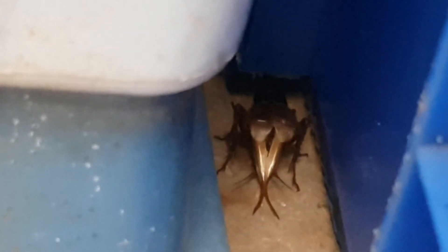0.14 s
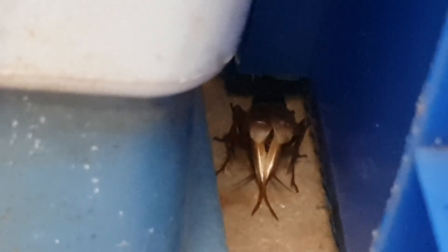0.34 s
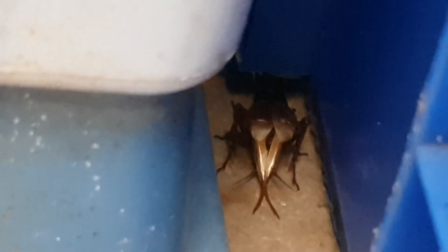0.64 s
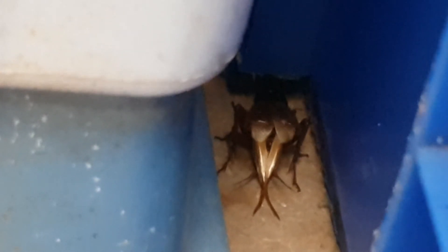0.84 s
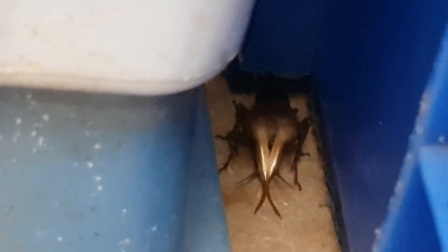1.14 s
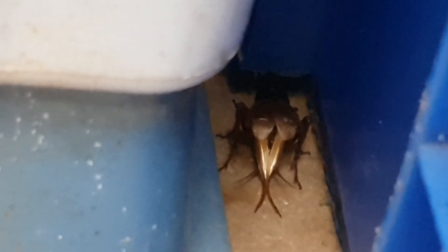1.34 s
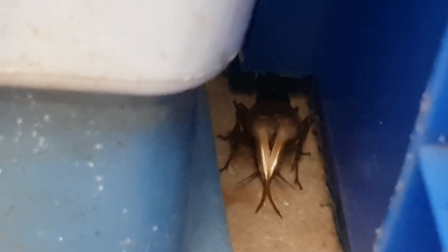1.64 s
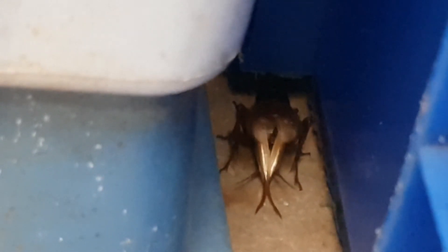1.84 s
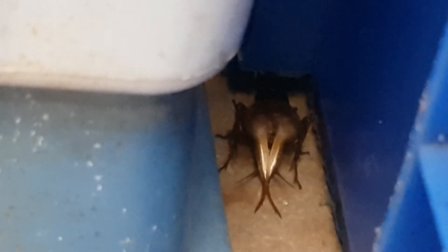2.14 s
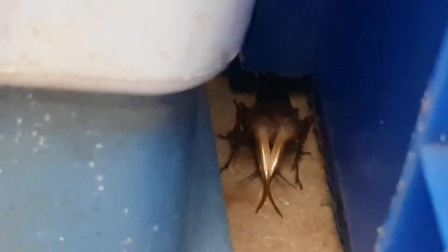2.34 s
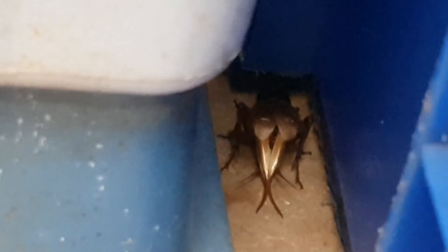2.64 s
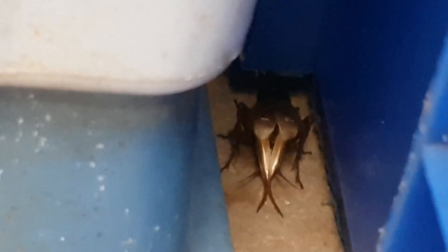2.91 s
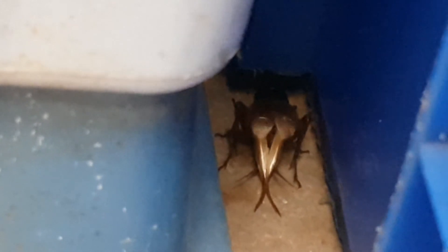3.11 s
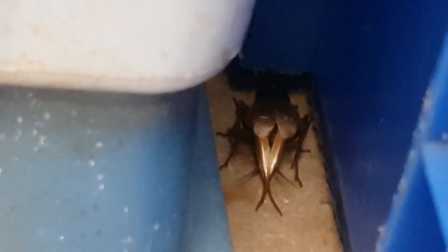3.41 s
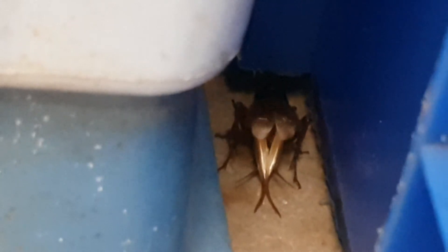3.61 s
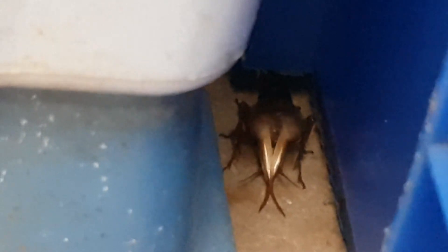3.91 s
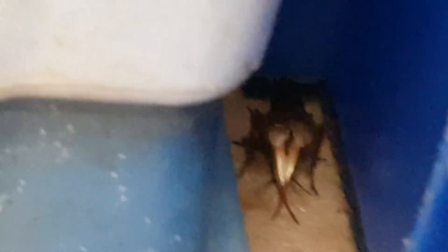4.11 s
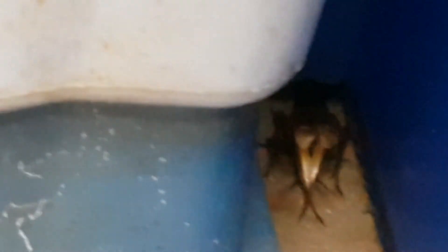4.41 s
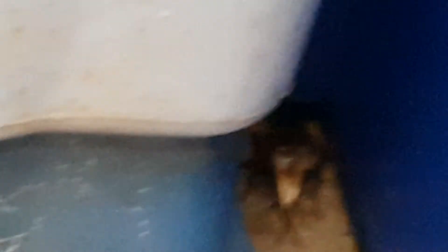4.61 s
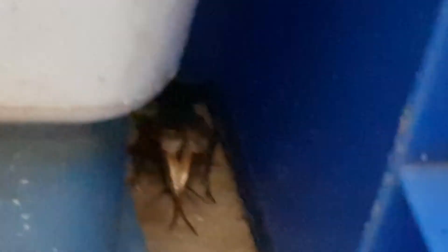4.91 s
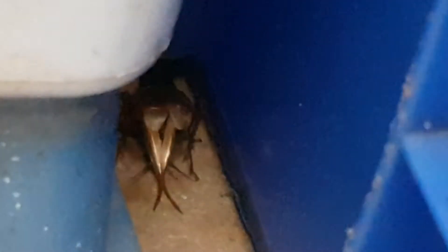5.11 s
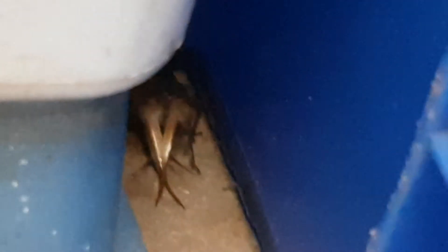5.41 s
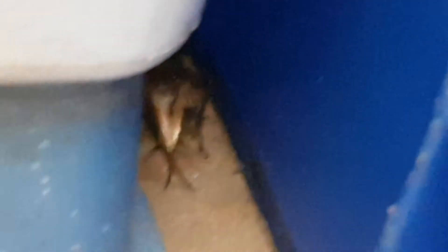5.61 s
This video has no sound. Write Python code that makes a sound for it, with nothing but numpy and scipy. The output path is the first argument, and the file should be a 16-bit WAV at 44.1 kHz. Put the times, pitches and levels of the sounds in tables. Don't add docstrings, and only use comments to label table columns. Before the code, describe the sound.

A cricket chirps loudly at very close range, a steady train of piercing high chirps with tight echoes in a quiet room.

```python
import sys
import numpy as np
from scipy import signal
from scipy.fft import rfft, irfft
from scipy.io import wavfile
from scipy.ndimage import uniform_filter1d, minimum_filter1d

SR = 44100
rng = np.random.default_rng(int(sys.argv[2]) if len(sys.argv) > 2 else 0)


def bounce(signal):
    frames = np.transpose(np.atleast_2d(signal))
    limited = np.clip(frames, -1, 1)
    pcm = np.round(limited * 32767).astype(np.int16)
    wavfile.write(sys.argv[1], SR, pcm)


def voltage_ratio(level):
    return 10 ** (np.asarray(level, float) / 20)


N = 253575
TIME = np.arange(N) / SR
SIDES = np.array([[1], [-1]])


def spectrum_gain(hz, db):
    f = np.maximum(np.arange(N // 2 + 1) * SR / N, 1)
    return voltage_ratio(np.interp(np.log(f), np.log(hz), db))


def colour(points):
    hz, db = points
    gain = spectrum_gain(hz, db)
    real, imaginary = rng.standard_normal((2, len(gain)))
    x = irfft((real + 1j * imaginary) * gain, N)
    return x / np.sqrt(np.mean(x ** 2))


def walk(rate):
    k = int(SR / rate)
    steps = np.repeat(rng.standard_normal(N // k + 1), k)
    return uniform_filter1d(uniform_filter1d(steps, k), k)[:N]


def swells(rows):
    return sum(height * np.sin(np.pi * np.clip((TIME - s) / length, 0, 1)) for s, length, height in rows)


def closures():
    # start in seconds, first to last wing closure in seconds, level in dB.
    chirps = [(.0023, .0727, -0.5), (0.2262, 0.074, 0), (0.4597, 0.025, 0), (0.9183, 0.07, 1),
              (1.1386, 0.073, 0), (1.395, 0.075, -0.5), (1.6426, 0.072, .5), (1.8725, .072, 0),
              (2.097, 0.074, 0.5), (2.3123, 0.075, 0), (2.545, 0.074, 0.5), (2.787, 0.072, 0),
              (3.0142, 0.073, 0), (3.236, 0.071, 0.5), (3.456, 0.074, -0.5), (3.6782, 0.071, 0),
              (3.8957, .0725, -0.5), (4.144, .049, 0), (4.5206, .0466, -1.5), (4.7628, 0.072, -1.5),
              (4.9968, 0.073, -1), (5.2238, .0733, -1.5), (5.4532, 0.075, -1.5), (5.6725, .0705, -1.5)]
    early_ms = [0, .7, .2, 0.01]
    tiring_db = [0.23, 0.14, -0.65, -0.39]
    period_s, scatter_db = 0.0243, 0.5
    rows, scatter = [], rng.standard_normal((len(chirps), len(tiring_db)))
    for (s, length, db), chance in zip(chirps, scatter):
        gaps = round(length / period_s)
        for k in range(gaps + 1):
            start = s + k * length / gaps - early_ms[k] / 1000
            rows.append((start, db + tiring_db[k] + scatter_db * chance[k], k))
    return rows


def wings():
    # time in ms, tooth rate in Hz, level in dB.
    stroke = [
        (0.0, 6360, -60),
        (0.8, 6211, -8),
        (4.0, 6192, -3),
        (7.0, 6090, -0.7),
        (10.0, 5945, 2),
        (12.0, 5786, 1),
        (14.0, 5646, -4),
        (17.0, 5335, -23),
        (20.0, 5120, -64),
    ]
    catch_db = [-21.5, -23, -10, -10.5]
    # frequency in Hz, level in dB per Hz.
    rasp_spectrum = [(4300, -34.5), (5200, -10.5), (6000, -9), (7000, -19.5), (7800, -11.5), (8600, -28.5),
                     (10400, -31.5), (12200, -13.5), (14000, -26), (15800, -31)]
    # frequency in Hz, level in dB per Hz.
    brush_spectrum = [(4300, -25), (5200, 7.5), (6200, -21), (7500, -15), (9500, -7.5), (12000, -16),
                      (15500, -25.5)]
    haste_hz, pitch_scatter = 73, 0.0028
    catch_hz, catch_ms, catch_scatter_db = 6600, 0.65, 2
    slip_ms, slip_length_ms, slip_drop_hz, slip_db = 10.5, 7, 620, -17.5
    octave_db, octave_fade_db_per_ms = -20, 1.0
    mirror_hz, mirror_width_hz, mirror_lift = 12290, 220, 1.6
    brush_lead_ms, brush_ms, brush_db = 9, 3.5, -31
    rasp_db, rasp_grain_db, sway_db, octave_sway_db = -24, 3, 2.5, 1.5

    ms, hz, db = np.transpose(stroke)
    t = np.arange(int(ms[-1] * SR / 1000)) * 1000 / SR
    whistle, octave, effort, brush = np.zeros((4, N + len(t)))
    rate = np.interp(t, ms, hz) + haste_hz * np.exp(-t / 2.1)
    slip = np.clip((t - slip_ms) / slip_length_ms, 0, 1)
    slipped = 2 * np.pi * np.cumsum(slip_drop_hz * slip) / SR
    brush_fade = np.exp(-t / brush_ms) + 0.3 * np.exp(-t / 9)
    strokes = closures()
    chance = rng.standard_normal((len(strokes), 3))
    for (s, level_db, place), (pitch, catch, turn) in zip(strokes, chance):
        at = slice(int(s * SR), int(s * SR) + len(t))
        phase = 2 * np.pi * np.cumsum(rate) * (1 + pitch_scatter * pitch) / SR
        push = voltage_ratio(level_db) * np.interp(t, ms, voltage_ratio(db))
        tick = t / catch_ms * np.exp(1 - t / catch_ms) * np.sin(2 * np.pi * catch_hz * t / 1000 + turn)
        slide = np.sin(np.pi * slip) ** 2 * np.sin(phase - slipped * (1 + 0.21 * turn))
        whistle[at] += push * np.sin(phase)
        whistle[at] += voltage_ratio(catch_db[place] + catch_scatter_db * catch) * tick
        whistle[at] += voltage_ratio(slip_db + level_db) * slide
        octave[at] += voltage_ratio(octave_db - octave_fade_db_per_ms * t) * push * np.sin(2 * phase)
        effort[at] += push
        if place == 0:
            opening = max(at.start - int(brush_lead_ms * SR / 1000), 0)
            brush[opening:opening + len(t)] += np.minimum(t / 1.2, 1) * brush_fade
    whistle, octave, effort, brush = whistle[:N], octave[:N], effort[:N], brush[:N]

    cell = signal.iirpeak(mirror_hz, mirror_hz / mirror_width_hz, fs=SR)
    octave = octave + mirror_lift * signal.lfilter(*cell, octave)
    rustle = voltage_ratio(brush_db) * brush * colour(np.transpose(brush_spectrum))
    rattle = uniform_filter1d(effort, size=400, origin=150)
    grain = voltage_ratio(rasp_db + rasp_grain_db * walk(120))
    rasp = grain * rattle * colour(np.transpose(rasp_spectrum))
    return np.array([whistle * voltage_ratio(sway_db * walk(360)), octave * voltage_ratio(octave_sway_db * walk(440)), rasp + rustle])


def places():
    # delay in ms, level in dB.
    resting = [
        [(0.1, -10.5), (1.762, -9.5), (3.383, -12.5), (4.821, -25.5), (7.74, -30), (9.7, -16.5), (11.329, -19)],
        [(0.13, -13), (2.425, -7.5), (4.24, -25.5), (5.971, -25), (8.277, -17), (11.453, -27.5), (14.27, -21)],
    ]
    # delay in ms, level in dB.
    later = [
        [[(.1, -15), (1.729, -7), (3.836, -14), (9.965, -15.5)], [(.103, -8), (2.43, -9.5), (4.062, -14.5),
         (5.466, -17)]],
        [[(2.072, -7.5), (4.842, -13), (6.072, -22), (7.202, -17.5)], [(.143, -12), (2.305, -7), (4.111, -18.5),
         (10.974, -19)]],
        [[(.1, -10.5), (2.619, -8), (5.26, -18), (10.761, -15.5)], [(.05, -8), (.964, -17.5), (2.379, -10.5),
         (4.851, -14)]],
        [[(.1, -10), (1.073, -20), (2.78, -9), (5.25, -18.5)], [(.043, -10.5), (1.479, -16.5), (3.049, -7),
         (5.528, -15)]],
        [[(.1, -6), (1.228, -13), (2.63, -7), (10.934, -22)], [(.046, -9.8), (1.307, -7.5), (2.541, -10.5),
         (4.688, -12)]],
        [[(.1, -15), (1.067, -6.5), (2.281, -16), (3.431, -12)], [(.018, -12), (1.447, -8.5), (2.841, -10.5),
         (7.855, -22)]],
    ]
    # delay in ms, level in dB.
    rebounds = [
        (6, -26),
        (7.7, -20),
        (11.5, -21),
    ]
    scatter_ms = 0.4
    shift = scatter_ms * rng.standard_normal((len(later), 2, len(rebounds)))
    out = [resting]
    for ears, shifts in zip(later, shift):
        place = []
        for paths, moves in zip(ears, shifts):
            place.append(paths + [(ms + move, db) for (ms, db), move in zip(rebounds, moves)])
        out.append(place)
    return out


def gap(song):
    moves_s = [4.4, 4.7, 4.93, 5.16, 5.39, 5.61]
    out, lead = np.zeros((2, N)), 32
    edges = [0, *(int(s * SR) for s in moves_s), N]
    taps = np.arange(1024) - lead
    for start, end, ears in zip(edges, edges[1:], places()):
        for ear, paths in enumerate(ears):
            response = sum(voltage_ratio(db) * np.sinc(taps - ms * SR / 1000) for ms, db in paths)
            heard = signal.fftconvolve(song[start:end], response)[lead:lead + N - start]
            out[ear, start:start + len(heard)] += heard
    return out


def reverberation(partials):
    # start in ms, level in dB, then the 60 dB decay in seconds of whistle, octave and rasp.
    tails = [
        (11, -18, 0.073, 0.055, 0.11),
        (18, -31.5, 0.64, 0.55, 0.62),
    ]
    out, t = 0, np.arange(SR // 2) / SR
    soak = signal.butter(8, 5430, "high", fs=SR, output="sos")
    partials = signal.sosfilt(soak, partials)
    for start_ms, db, *t60 in tails:
        late = np.maximum(t - start_ms / 1000, 0)
        noise = rng.standard_normal((2, len(t))) * np.minimum(late / 0.0066, 1)
        for partial, decay in zip(partials, t60):
            fade = np.exp(-np.log(1000) * late / decay)
            response = noise * fade * voltage_ratio(db) / np.sqrt(SR / 100)
            out = out + signal.fftconvolve(partial[None], response, axes=1)[:, :N]
    return out


def motor():
    # multiple of the motor rate, level in dB, whine share 0-1.
    parts = [
        (1, -1, 0.02),
        (2, -7, 0.19),
        (3, -.5, 0.91),
        (4.75, 1.5, 0.5),
    ]
    # start in seconds, length in seconds, rise in dB.
    strains = [(0.323, 0.049, 12), (0.634, 0.11, 12), (0.928, 0.076, 16), (1.072, 0.18, 15),
               (1.357, .2, 13.5), (2.202, .22, 13.5), (2.895, .22, 17.5), (3.332, 0.11, 6),
               (4.34, 0.17, 13), (4.62, 0.2, 16), (4.982, 0.12, 11)]
    motor_hz, out = 348.2, 0
    hum_db = -66 + 2 * walk(12)
    whine_db = -80.5 + 4 * walk(11) + swells(strains)
    phase = 2 * np.pi * np.cumsum(motor_hz * (1 + 0.007 * walk(40))) / SR
    for multiple, db, share in parts:
        level_db = db + (1 - share) * hum_db + share * whine_db
        lag = 0.29 * (multiple - 1) * SIDES
        out = out + voltage_ratio(level_db) * (1.1 + 1.4 * walk(70)) * np.sin(multiple * phase + lag)
    return out


def draughts():
    # start in seconds, length in seconds, centre in Hz, width in Hz, level in dB.
    murmurs = [(0, 5.4, 2540, 348, -72.5), (0.194, 0.28, 2430, 500, -65), (0.49, 0.11, 2530, 200, -59.5),
               (.84, .09, 7500, 900, -67), (.85, .09, 3300, 700, -68), (1.164, 0.17, 3120, 350, -63),
               (2.498, 0.14, 2410, 505, -67), (4.025, 0.45, 430, 40, -62), (4.332, 0.11, 1276, 40, -67),
               (4.33, 0.17, 1850, 40, -64), (4.404, 0.3, 2600, 900, -67), (4.7, .2, 2250, 596, -67)]
    out = 0
    for s, length, hz, width, level_db in murmurs:
        swell = swells([(s, length, 1)]) * voltage_ratio(5.45 * walk(30))
        shape = ([hz - 2 * width, hz - width / 2, hz + width / 2, hz + 2 * width], [-30, 0, 0, -30])
        air = colour(shape) + min(hz / 2500, 1) * SIDES * colour(shape)
        out = out + voltage_ratio(level_db) * swell * air
    return out


def hush():
    # frequency in Hz, level in dB per Hz.
    room_spectrum = [(12, -68), (20, -32), (55, -9), (134, -5.5), (241, -12.5), (270, -8), (347, -12),
                     (377, -4.5), (422, -9), (897, -19.5), (1150, -20), (4300, -20), (4810, -26),
                     (5850, -21), (10000, -29.5), (16000, -39.5)]
    # frequency in Hz, left-right likeness from -1 to 1.
    likeness = [
        (60, 0.94),
        (130, 0.91),
        (290, 0.87),
        (640, 0.37),
        (1410, -0.19),
        (3100, 0.11),
        (6820, -0.12),
        (15000, -0.0),
    ]
    # start in seconds, length in seconds, rise in dB.
    handling = [
        (4.453, 0.15, 3.5),
    ]
    hz, like = np.transpose(likeness)
    gust_db = 1 * walk(6) + swells(handling)
    out = 0
    for centre in 25 * 1.6 ** np.arange(14):
        shape = (centre * np.array([0.5, 0.8, 1.25, 2]), [-40, 0, 0, -40])
        alike = np.clip(np.interp(np.log(centre), np.log(hz), like), -0.9, 0.91)
        gain = voltage_ratio(gust_db + 1.82 * walk(7) + 2.8 * walk(18)) * np.sqrt(centre)
        common = np.sqrt(1 + alike) * colour(shape)
        opposed = np.sqrt(1 - alike) * SIDES * colour(shape)
        out = out + gain * (common + opposed)
    out = irfft(rfft(out) * spectrum_gain(*np.transpose(room_spectrum)), N)
    return voltage_ratio(-55.0 + 0.32 * SIDES) * out / np.sqrt(np.mean(out ** 2))


def scene():
    small_wings = signal.butter(6, 4700, "high", fs=SR, output="sos")
    partials = signal.sosfilt(small_wings, wings())
    cricket = gap(partials.sum(axis=0)) + reverberation(partials)
    return cricket + hush() + motor() + draughts()


def band_limit(x):
    return signal.sosfilt(signal.butter(12, 16160, fs=SR, output="sos"), x)


def record(dry):
    headroom = np.minimum(0.97 / (np.max(np.abs(dry), axis=0) + 1e-9), 1)
    gain = uniform_filter1d(minimum_filter1d(headroom, size=133), size=133)
    top = signal.ellip(10, 0.2, 70, 15800, fs=SR, output="sos")
    return band_limit(signal.sosfilt(top, dry * gain))


dry = scene()
out = record(dry)
bounce(out)
```